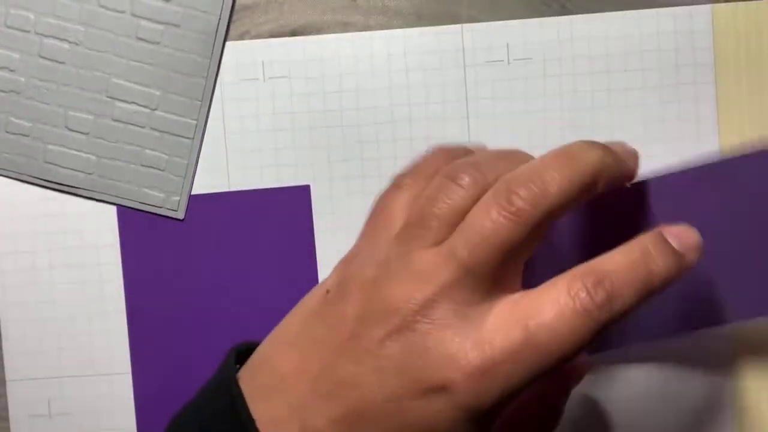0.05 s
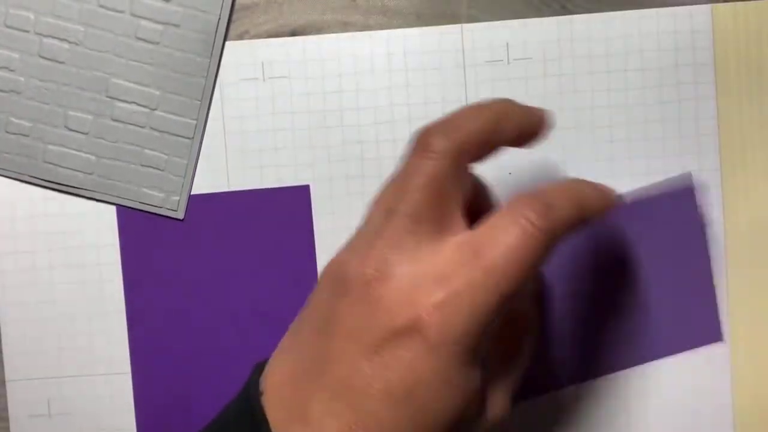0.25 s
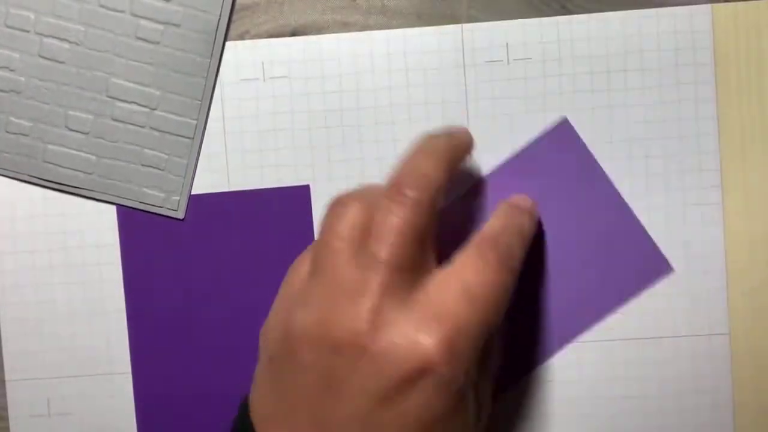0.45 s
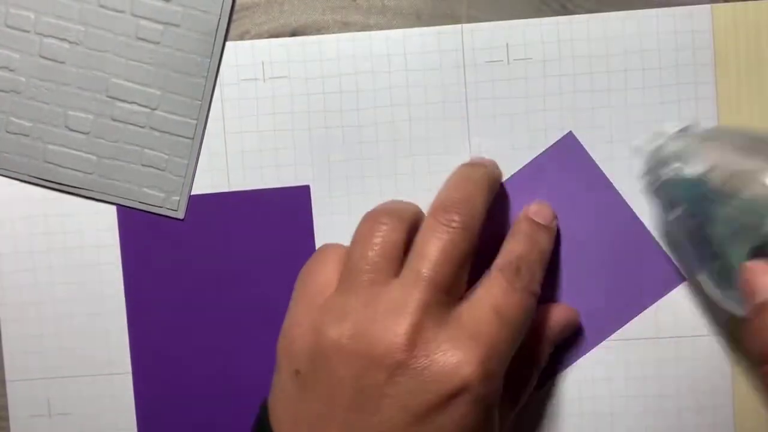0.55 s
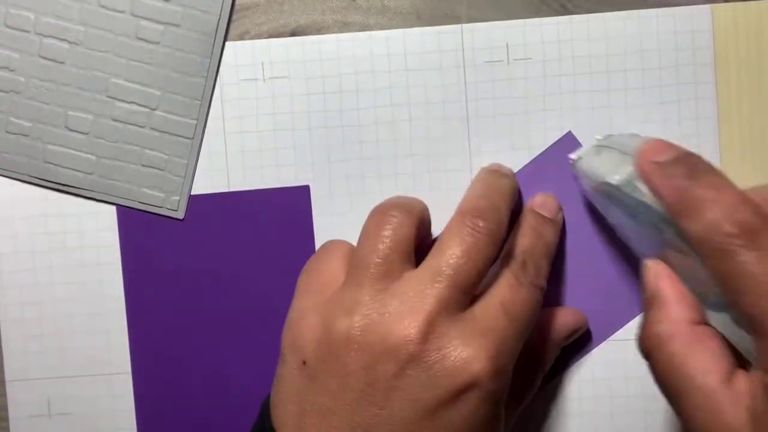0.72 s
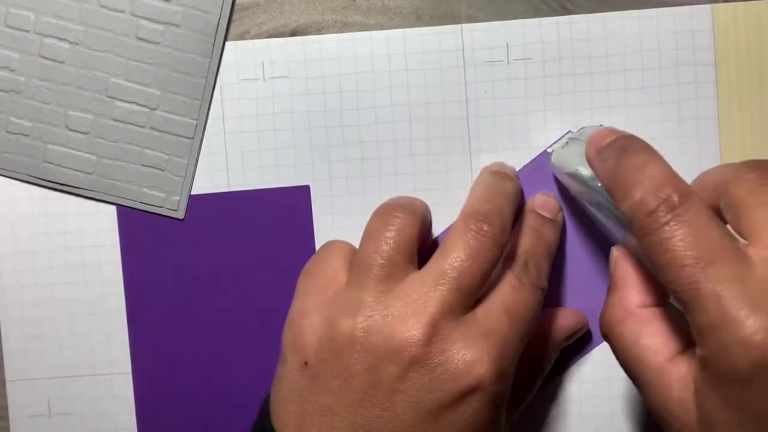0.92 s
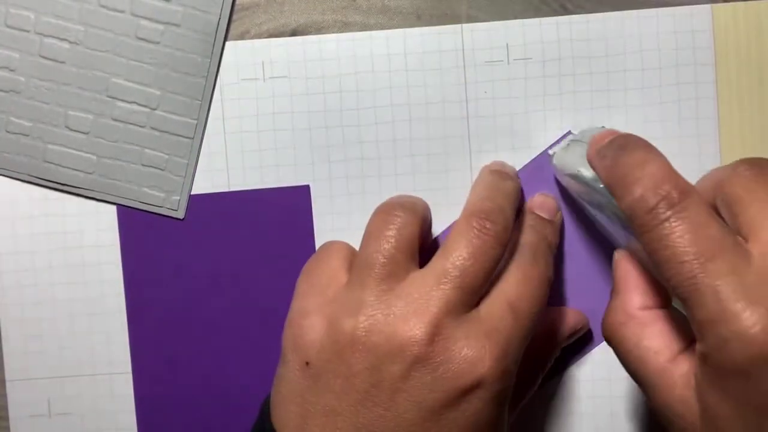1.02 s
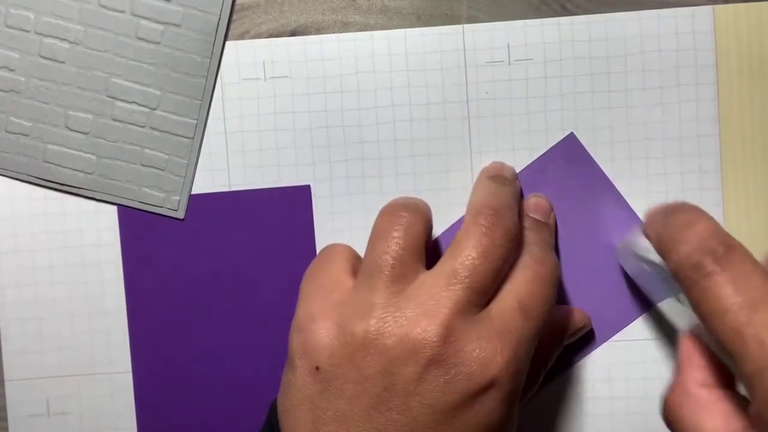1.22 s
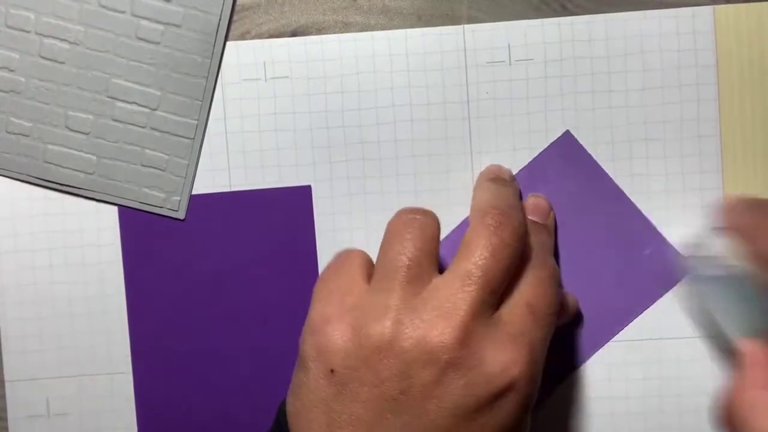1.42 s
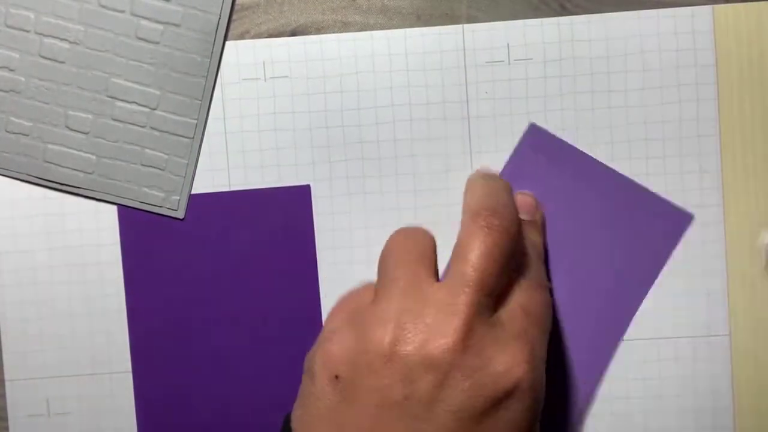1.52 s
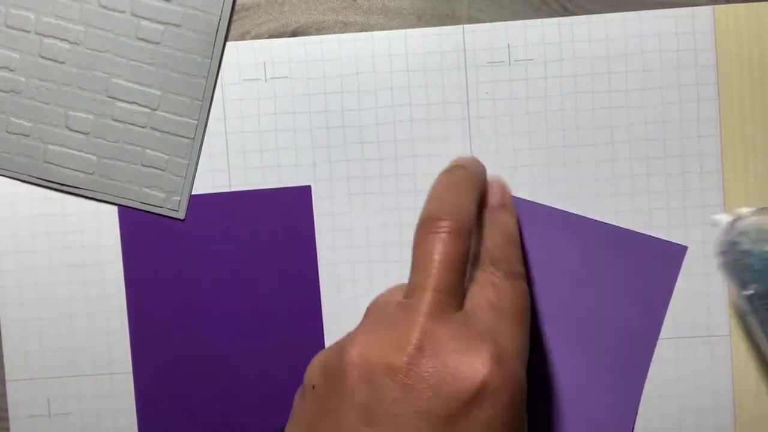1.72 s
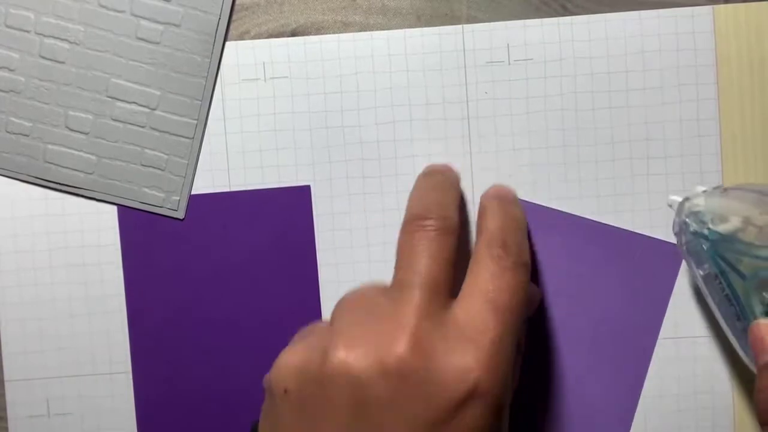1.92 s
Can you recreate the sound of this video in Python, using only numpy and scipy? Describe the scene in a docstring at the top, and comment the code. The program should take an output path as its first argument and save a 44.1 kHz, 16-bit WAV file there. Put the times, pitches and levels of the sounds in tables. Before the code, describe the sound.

Close up at a desk in a quiet room, stiff card flicks down and slides. A plastic tape runner ratchets briefly as it lays glue, followed by faint rubs and ticks of the card turning and soft hand bumps.

```python
"""A desk with a craft mat in a small, quiet room, the microphone close to a square of cardstock.
Fingers pull the card over, its edge snaps down in bending waves, and it slides with a swish of fibres.
A tape runner lands, rolls a short stroke of glue and lifts: the ratchet rings its plastic case
and the peeling tape crackles. Then the card is turned round with small flicks and rubs.
Underneath, the hands drag and bump softly."""
import sys
import numpy as np
from scipy import signal
from scipy.fft import rfft, irfft
from scipy.io import wavfile

SR = 44100
rng = np.random.default_rng(int(sys.argv[2]) if len(sys.argv) > 2 else 0)


def generate_wav(sig):
    """Save sig (samples, or channels by samples) to the path in sys.argv[1] as 16-bit PCM at SR."""
    pcm = np.round(np.clip(np.atleast_2d(sig).T, -1, 1) * 32767).astype(np.int16)
    wavfile.write(sys.argv[1], SR, pcm)


N = 85995


def amp(db):
    """Decibels to gain."""
    return 10 ** (np.asarray(db) / 20)


def unit_rms(x):
    """Scales to rms 1."""
    return x / np.sqrt(np.mean(x ** 2) + 1e-20)


def unit_energy(x):
    """Scales to energy 1."""
    return x / (np.linalg.norm(x) + 1e-12)


def read(points, hz):
    """Reads a table on a log-frequency axis."""
    f, value = np.transpose(points)
    return np.interp(np.log(hz + 1), np.log(f + 1), value)


def level(points):
    """Gain along a level curve, fading quickly outside it."""
    s, db = np.transpose(points)
    t = np.arange(N) / SR
    outside_s = np.maximum(s[0] - t, 0) + np.maximum(t - s[-1], 0)
    return amp(np.interp(t, s, db) - 2000 * outside_s)


def add(mix, start_s, sound):
    """Mixes a sound in at a time."""
    part = mix[max(round(start_s * SR), 0):][:len(sound)]
    part += sound[:len(part)]


def decay(t, t60):
    """Exponential fall of 60 dB in t60 seconds."""
    return np.exp(-np.log(1000) * t / t60)


def bell(f, hz, width_hz, db):
    """A bell-shaped boost or dip in dB."""
    return db / (1 + (2 * (f - hz) / width_hz) ** 2)


def coloured(x, db_at, size=4096):
    """Minimum-phase filter whose gain in dB is a function of frequency."""
    f = abs(np.fft.fftfreq(size, 1 / SR))
    log_gain = np.log(amp(np.maximum(db_at(f), -100)))
    taps = np.fft.ifft(np.exp(np.conj(signal.hilbert(log_gain)))).real
    return signal.fftconvolve(x, taps[:size // 2])[:len(x)]


def shaped(x, colour):
    """Filters by a colour table, then scales to rms 1."""
    return unit_rms(coloured(x, lambda f: read(colour, f)))


def noise_band(hz, width_hz):
    """Noise through a steep resonance, rms 1."""
    resonance_db = lambda f: -20 * np.log10(1 + (2 * (f - hz) / width_hz) ** 2)
    return unit_rms(coloured(rng.standard_normal(N), resonance_db, size=16384))


def friction(grain_db, grains_per_s, grain_share, flutter_db, flutter_s):
    """Fibres catching: fine noise and larger grains under an unsteady pressure."""
    grains = rng.choice([-1, 1], N) * amp(grain_db * np.minimum(rng.exponential(1, N), 3))
    grains *= rng.random(N) < grains_per_s / SR
    knots_s = np.cumsum(rng.uniform(.5, 1.5, N // 20)) * flutter_s
    pressure = np.interp(np.arange(N) / SR, knots_s, rng.standard_normal(N // 20))
    return (rng.standard_normal(N) + grain_share * unit_rms(grains)) * amp(flutter_db * pressure)


def room_tone(level_db=-78.5):
    """The faint, steady hush of the room's air."""
    # spectrum of the air: frequency_hz, gain_db
    colour = [(15, -94), (25, -16), (145, -1.5), (335, 1), (988, -11.5), (14400, -20), (16000, -39)]
    return amp(level_db) * shaped(rng.standard_normal(N), colour)


def room(x, tail_db=-17, desk_db=-15, size=16384):
    """The close, direct sound with quick reflections from the desk and a small room's faint tail."""
    # reverberation time: frequency_hz, t60_s
    reverb_times = [(200, 0.52), (2000, 0.19), (12000, 0.12)]
    t = np.arange(size) / SR
    hz, frame_s, spectra = signal.stft(rng.standard_normal(size), SR, nperseg=256)
    spectra *= decay(frame_s, read(reverb_times, hz)[:, None])
    tail = signal.istft(spectra, SR, nperseg=256)[1][:size] * (t > .008)
    desk = rng.standard_normal(size) * decay(t, t60=.02) * (t > .002)
    reflections = amp(tail_db) * unit_energy(tail) + amp(desk_db) * unit_energy(desk)
    return x + signal.fftconvolve(x, reflections)[:N]


def bump(hz, t60, rise_s=.0046, size=8000):
    """A padded blow: a damped low note with some rustle around it."""
    t = np.arange(size) / SR
    rustle = unit_rms(coloured(rng.standard_normal(size), lambda f: -9 * abs(np.log2((f + 1) / hz))))
    envelope = np.minimum(t / rise_s, 1) ** 2 * decay(t, t60)
    return unit_energy(envelope * (np.sin(2 * np.pi * hz * t) + .49 * rustle))


def hands():
    """Handling noise: dull dragging, soft bumps and a fingertip's faint judder."""
    # hands dragging on the desk: time_s, level_db
    drag_levels = [(0, -53.5), (.035, -52.5), (.07, -62), (.19, -75), (.235, -58.5), (.3, -73.5),
                   (.5, -68.5), (.61, -77.5), (.66, -74), (.69, -87.5), (.79, -81), (.82, -66), (.9, -72),
                   (1.02, -68), (1.28, -69), (1.34, -66), (1.41, -62.5), (1.6, -84.5), (1.75, -59.5),
                   (1.8, -60.5), (1.87, -68), (1.95, -65)]
    # spectrum of the drag: frequency_hz, gain_db
    colour = [(20, -24), (40, 0.5), (70, -1.5), (150, 0.5), (300, 1.5), (600, -4.5), (950, -2.5),
              (1300, -9), (2200, -11.5), (3200, -17.5), (8000, -36)]
    # fingers, card and runner bumping the mat: start_s, energy_db, pitch_hz, t60_s
    bumps = [(.002, -26, 323, 0.013), (.08, -31, 304, 0.018), (0.2221, -15.5, 897, 0.025),
             (0.232, -25, 341, 0.013), (.2545, -18.5, 912, 0.034), (.807, -18, 133, 0.083),
             (0.811, -30, 64.4, 0.093), (0.807, -33, 300, 0.015), (0.88, -30.5, 348, 0.025),
             (.928, -32, 640, 0.18), (0.9598, -29.5, 550, 0.027), (0.969, -28.5, 297, 0.018),
             (1.055, -26.5, 441, 0.14), (1.106, -23, 475, 0.036), (1.161, -17, 500.5, 0.12),
             (1.187, -18.5, 491, .05), (1.241, -29, 81, 0.08), (1.363, -28.5, 320, 0.085),
             (1.3614, -31.5, 900, 0.025), (1.403, -22.5, 493, 0.083), (1.523, -33.5, 115, 0.098),
             (1.79, -27, 124, 0.062)]
    # fingertip juddering on the turning card: time_s, level_db
    judder_levels = [(1.58, -79), (1.63, -67), (1.7, -66), (1.74, -77)]
    drag = friction(grain_db=6.5, grains_per_s=710, grain_share=.38, flutter_db=1.5, flutter_s=.012)
    out = shaped(drag, colour) * level(drag_levels)
    for start_s, db, hz, t60 in bumps:
        add(out, start_s, amp(db) * bump(hz, t60))
    return out + noise_band(hz=193, width_hz=23) * level(judder_levels)


def card_rubs():
    """Fingers and card edges rub lightly; the pull is thinner in the midrange than the turn."""
    # pulling the card over: time_s, gain_db
    pull_gains = [(0, -56), (.04, -63), (.055, -58.5), (.08, -73.5), (.087, -57), (.15, -69), (.165, -63),
                  (.198, -57.5), (.208, -71.5), (.25, -70.5)]
    # turning it round: time_s, level_db
    turn_levels = [(1.26, -66.5), (1.361, -63), (1.369, -55), (1.41, -51), (1.435, -59.5), (1.5, -52.5),
                   (1.572, -51), (1.585, -59), (1.598, -52.5), (1.612, -62.5), (1.64, -58.5), (1.65, -51),
                   (1.68, -48.5), (1.70, -63), (1.745, -60.5), (1.80, -61.5), (1.85, -73.5), (1.95, -66.5)]
    # spectrum of the rub: frequency_hz, gain_db
    colour = [(100, -22.5), (200, -1.5), (500, -2), (1400, -8), (3500, -4), (4800, 3), (5400, 2), (6800, 2),
              (8640, -4.5), (12000, -9.5), (16000, -20)]
    fibres = friction(grain_db=1, grains_per_s=2300, grain_share=.73, flutter_db=3, flutter_s=.002)
    rub = shaped(fibres, colour)
    thin_rub = coloured(rub, lambda f: bell(f, hz=2900, width_hz=2200, db=-6))
    return thin_rub * level(pull_gains) + rub * level(turn_levels)


def card_slide(fizz_hz=6500, fizz_db=-46, drift_hz_per_s=750):
    """The card swishes flat over the mat: speed adds fizz, and a narrow ring drifts upward."""
    # sliding friction: time_s, level_db
    swish_levels = [(.25, -57), (.275, -49), (.31, -48), (.333, -45.5), (.365, -49), (.405, -56),
                    (.448, -47.5), (.484, -52.5), (.53, -58), (.59, -64), (.64, -84.5), (.7, -83.5)]
    # spectrum of the slide: frequency_hz, gain_db
    colour = [(60, -34), (150, -10), (800, -16.5), (1700, -2.5), (2200, -5.5), (4400, 0), (5800, -2.5),
              (8100, -1), (8800, -6.5), (16000, -14.5)]
    # the card ringing in the slide's two surges: time_s, level_db
    ring_levels = [(.26, -57), (.338, -46.5), (.4, -62.5), (.452, -48.5), (.52, -81)]
    drag = friction(grain_db=-1, grains_per_s=3500, grain_share=.8, flutter_db=1.5, flutter_s=.0049)
    push = level(swish_levels)
    speed = push / push.max()
    hiss = shaped(rng.standard_normal(N), colour)
    fizz = unit_rms(signal.lfilter(*signal.butter(2, fizz_hz, "high", fs=SR), hiss))
    since_peak_s = (np.arange(N) - push.argmax()) / SR
    drift = np.exp(1j * np.pi * drift_hz_per_s * since_peak_s ** 2)
    ring = (signal.hilbert(noise_band(hz=2733, width_hz=380)) * drift).real
    return shaped(drag, colour) * push + fizz * amp(fizz_db) * speed ** 2 + ring * level(ring_levels)


def flick(hz, octaves, travel_ms, echo_db, body_db=-22.5, low_cut_hz=300, size=4096):
    """A snap spreads through the card as a bending wave, treble first, and echoes from the edges."""
    # how the card radiates a snap: frequency_hz, gain_db
    colour = [(500, 4), (2300, 1), (3400, -2), (4200, 2), (5100, 2), (6000, -5), (6900, 2), (8000, 0),
              (9200, -4.5), (12000, 1), (16000, -10)]
    f, t = np.fft.rfftfreq(size, 1 / SR) + 1, np.arange(size) / SR
    hump = (1 + (np.log2(f / hz) / octaves) ** 2 / 2) ** -1.58
    body = amp(body_db) / (1 + f / 6000)
    snap = (hump + body) / (1 + (low_cut_hz / f) ** 2)
    dispersion = np.exp(-4j * np.pi * travel_ms * np.sqrt(f / 1000))
    echoes = unit_energy(rng.standard_normal(size) * decay(t, t60=.02) * (t > .0005))
    wave = irfft(snap * dispersion * (1 + amp(echo_db) * rfft(echoes)))
    return unit_energy(shaped(wave, colour))


def card_flicks():
    """The card's edge snaps as it is pulled over and turned."""
    # edge snaps: start_s, energy_db, centre_hz, width_octaves, travel_ms (at 1 kHz), echo_db
    flicks = [(.029, -28, 1070, 1, 1.5, -1), (0.0505, -30, 6270, 1.3, .8, -1),
              (.2167, -16.5, 1610, 0.83, 1.7, -6), (0.2267, -15, 5050, 0.36, 1.16, -14),
              (0.2503, -2.5, 4650, 0.81, 2.2, -2), (0.2512, -10.5, 1300, 2.8, 2.8, 0.5),
              (1.3981, -17, 6100, 0.59, .9, -9), (1.4092, -15, 5950, 0.21, .8, -28),
              (1.4095, -17.5, 1730, 0.85, 2.04, 1), (1.5155, -16, 6100, 0.51, 0.78, -9),
              (1.5155, -14, 1410, 0.61, 1.2, -4), (1.6433, -23.5, 2250, 1, 1.2, -3),
              (1.715, -30.5, 1750, 1, 4, 0), (1.7664, -16.5, 2700, 1.2, 2.8, 4.5),
              (1.7873, -20, 2680, 1.7, 2.2, 6), (1.7971, -24.5, 5700, 0.68, 1.03, -14)]
    out = np.zeros(N)
    for start_s, db, *shape in flicks:
        add(out, start_s, amp(db) * flick(*shape))
    return out


def case_blow(detune=.012, size=6000):
    """One blow on the runner: a short crack, a rattle and the modes of its plastic case."""
    # modes of the case: pitch_hz, gain_db, t60_s
    modes = [(493, -6.5, 0.05), (937, -13, 0.039), (1814, -6.5, 0.028), (2050, -5.5, 0.025),
             (3030, -7, 0.023), (3550, -0.5, 0.011), (6560, 3.5, 0.01), (7590, -4, 0.018),
             (11400, -7, 0.01)]
    t = np.arange(size) / SR
    ring = np.zeros(size)
    for hz, db, t60 in modes:
        detuned_hz = hz * (1 + detune * rng.uniform(-1.34, 1))
        ring += amp(db) * decay(t, t60) * np.sin(2 * np.pi * (detuned_hz * t + rng.random()))
    crack = amp(5) * decay(t, t60=.012)
    rattle = amp(-4.5) * decay(t, t60=.029)
    return ring + rng.standard_normal(size) * (crack + rattle)


def runner_roll(rattle_db=-7, rumble_db=-57.5):
    """Peeling glue tape crackles and rattles the case while the roller rumbles on the desk."""
    # tape peeling under the roller: time_s, level_db
    peel_levels = [(1.02, -68.5), (1.08, -58), (1.11, -52), (1.155, -50.5), (1.2, -42.5), (1.245, -54.5),
                   (1.265, -55), (1.3, -65)]
    # spectrum of the peel: frequency_hz, gain_db
    colour = [(100, 4.5), (280, -10), (500, 2.5), (1000, -4), (2000, 1.5), (3000, -6), (7000, -8.5),
              (16000, -23.5)]
    peel = friction(grain_db=5, grains_per_s=1100, grain_share=1.12, flutter_db=2, flutter_s=.0045)
    rattle = amp(rattle_db) * signal.fftconvolve(peel, unit_energy(case_blow()))[:N]
    push = level(peel_levels)
    rumble = noise_band(hz=70.5, width_hz=39) * amp(rumble_db) * (push / push.max()) ** .84
    return shaped(peel + rattle, colour) * push + rumble


def runner_knocks(low_cut_hz=700):
    """Softer, longer contacts leave out the treble and bring out the case's nasal ring."""
    # the runner lands, is pressed and stops: start_s, energy_db, high_cut_hz, rise_s
    knocks = [(0.8039, -29.5, 2826, 0.0014), (0.891, -35, 1900, 0.0032), (.974, -32, 2270, 0.0036),
              (1.070, -32, 4500, 0.00063), (1.1046, -19, 3630, 0.0013), (1.123, -24.5, 2020, 0.0018),
              (1.211, -18.5, 2500, 0.00093), (1.2213, -10.5, 3020, 0.00053), (1.238, -16, 2270, 0.001)]
    nasal_db = lambda f: bell(f, hz=1890, width_hz=240, db=7)
    out = np.zeros(N)
    for start_s, db, high_cut_hz, rise_s in knocks:
        blow = case_blow()
        blow *= 1 - np.exp(-np.arange(len(blow)) / SR / rise_s)
        loss_db = lambda f: 20 * np.log10(1 + (f / high_cut_hz) ** 2 + low_cut_hz / (f + 1))
        knock = coloured(blow, lambda f: nasal_db(f) - loss_db(f))
        add(out, start_s, amp(db) * unit_energy(knock))
    return out


def runner_ratchet():
    """The ratchet strikes the case, each click with its own brightness."""
    # ratchet clicks: start_s, energy_db, treble_tilt_db_per_octave
    clicks = [(.818, -31.5, -3), (0.8891, -31, -3.5), (0.9043, -32, -3.5), (0.9227, -34, -5),
              (0.972, -32.5, -9.5), (1.032, -32, -1.5), (1.0498, -31.5, 3), (1.0994, -30, 6.5),
              (1.1154, -29, 8), (1.1272, -23.5, 9), (1.139, -27, 5), (1.1533, -25, 8), (1.1623, -9, 5),
              (1.1675, -11.5, 2), (1.1739, -15, 3), (1.1911, -8.5, 3), (1.2016, -14, -3),
              (1.2084, -13.5, 3), (1.2695, -36, 10)]
    # filter common to all clicks: frequency_hz, gain_db
    colour = [(40, -21), (250, -10.5), (500, 0), (2000, 2.5), (7000, 0), (9000, -8), (12000, -0.5),
              (16000, -12)]
    out = np.zeros(N)
    for start_s, db, tilt in clicks:
        click = coloured(case_blow(), lambda f: read(colour, f) + tilt * np.log2(1 + f / 1200))
        add(out, start_s, amp(db) * unit_energy(click))
    return out


def scene():
    """Card, tape runner and hands close up, over room tone, in mono."""
    air = room_tone()
    card = card_flicks() + card_rubs() + card_slide()
    runner = runner_ratchet() + runner_knocks() + runner_roll()
    return (room(card + runner + hands()) + air)[None]


def record(dry, low_cut_hz=26, band_limit_hz=16150):
    """The microphone's low cut and the recorder's band limit."""
    thinned = signal.lfilter(*signal.butter(2, low_cut_hz, "high", fs=SR), dry)
    lowpass = signal.firwin(511, band_limit_hz, window=("kaiser", 9), fs=SR)
    return signal.oaconvolve(thinned, lowpass[None], "same")


dry = scene()
out = record(dry)
generate_wav(out)
```